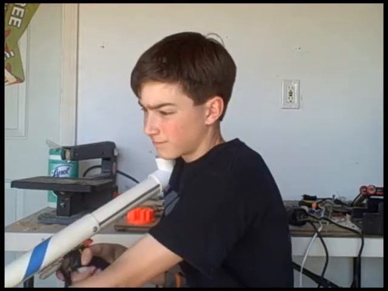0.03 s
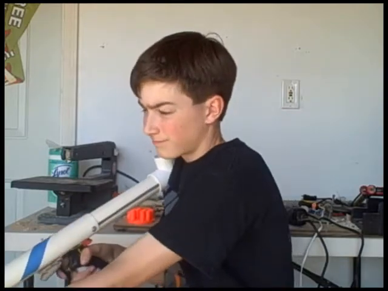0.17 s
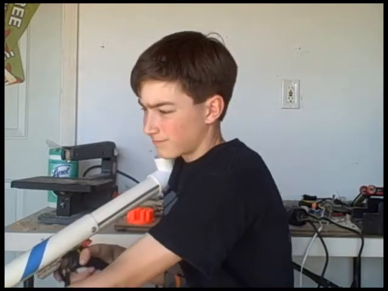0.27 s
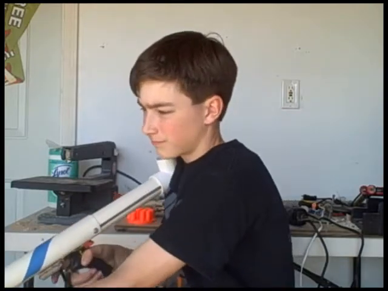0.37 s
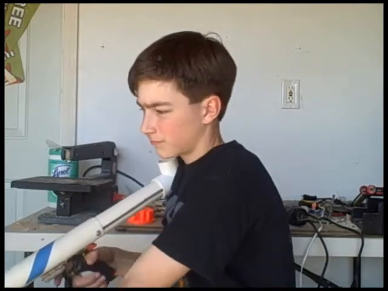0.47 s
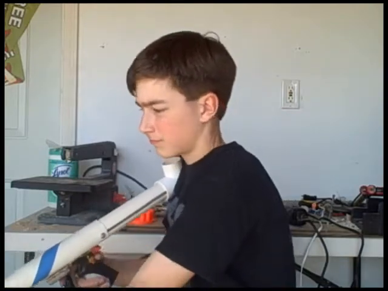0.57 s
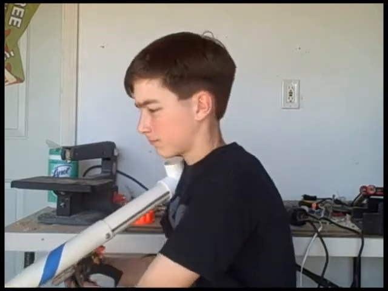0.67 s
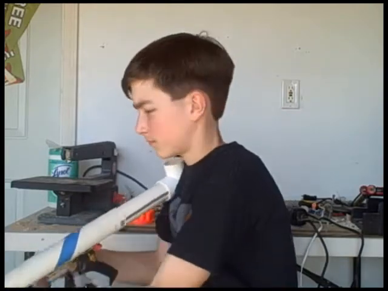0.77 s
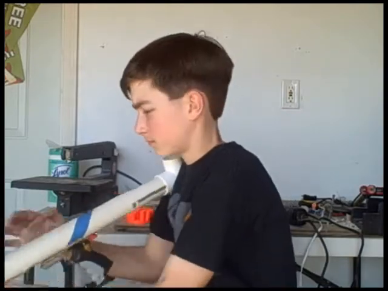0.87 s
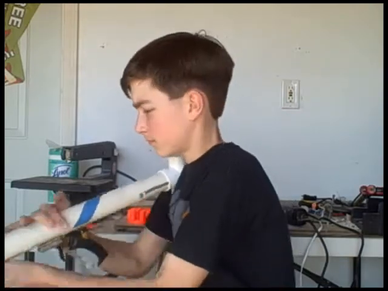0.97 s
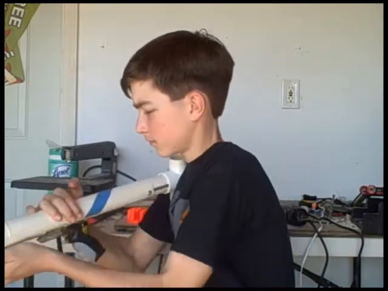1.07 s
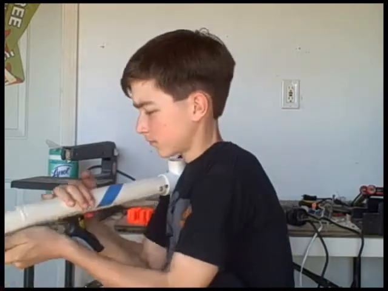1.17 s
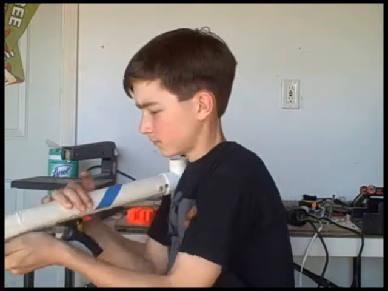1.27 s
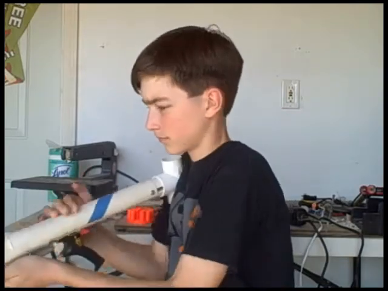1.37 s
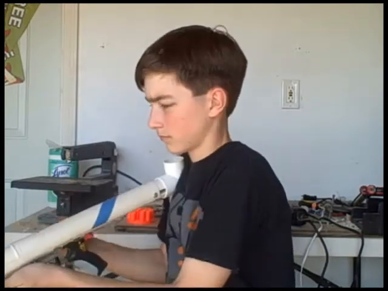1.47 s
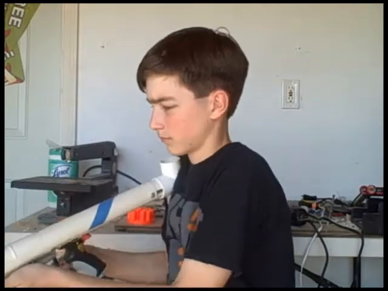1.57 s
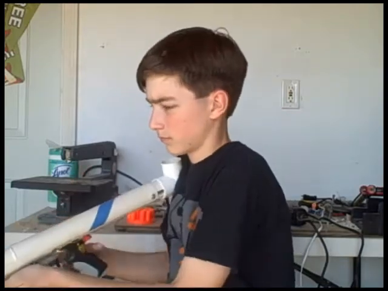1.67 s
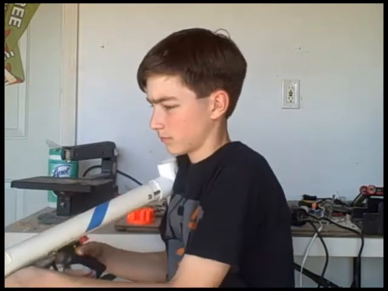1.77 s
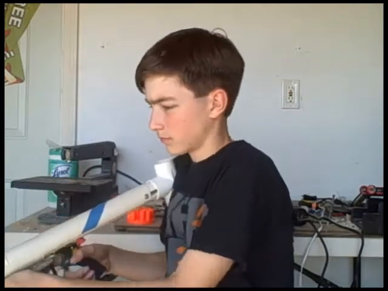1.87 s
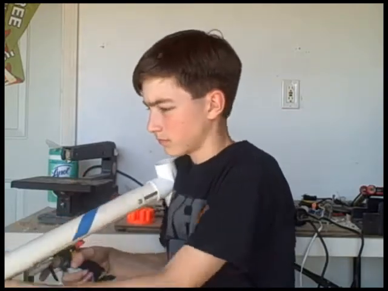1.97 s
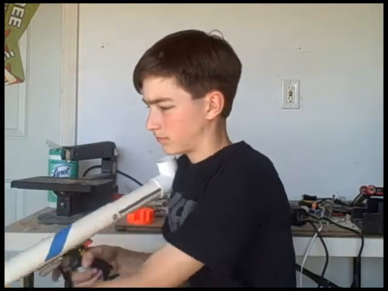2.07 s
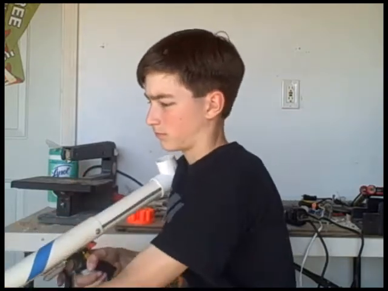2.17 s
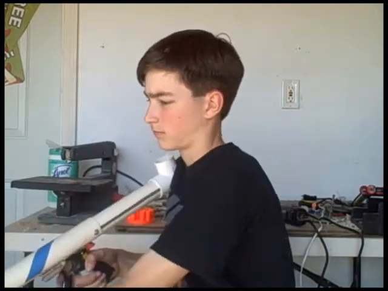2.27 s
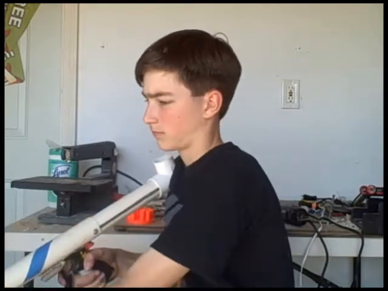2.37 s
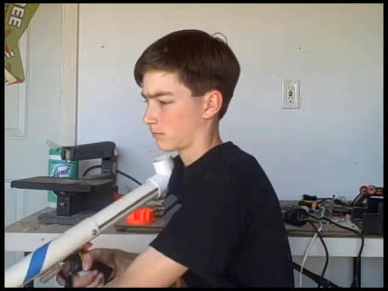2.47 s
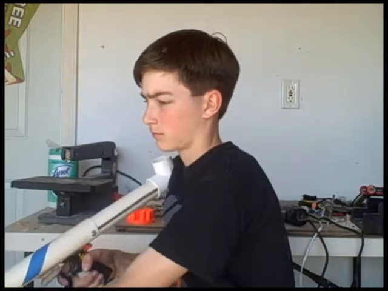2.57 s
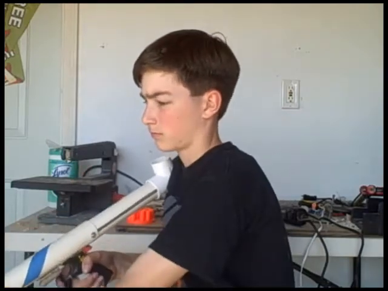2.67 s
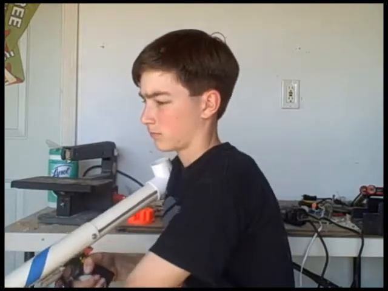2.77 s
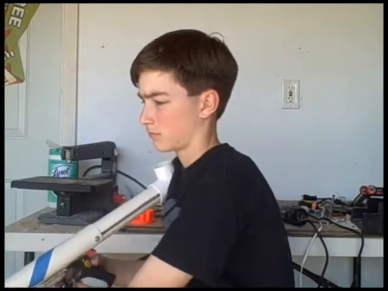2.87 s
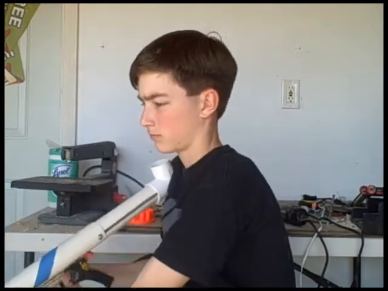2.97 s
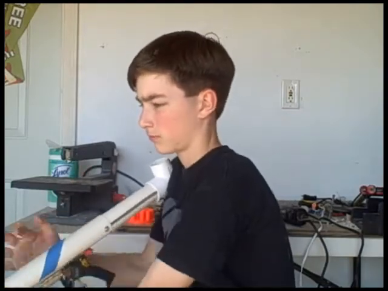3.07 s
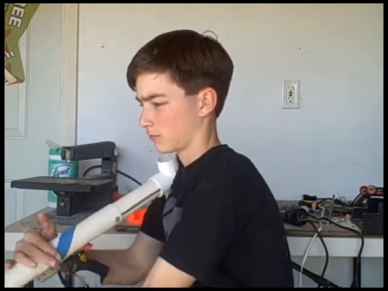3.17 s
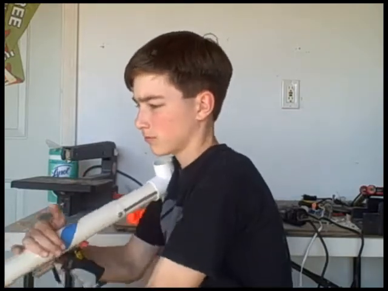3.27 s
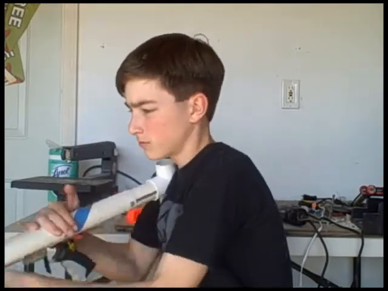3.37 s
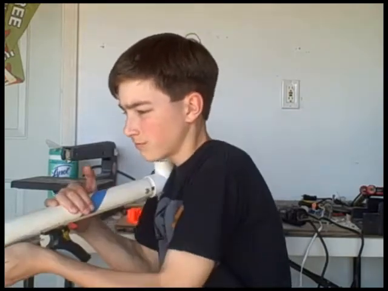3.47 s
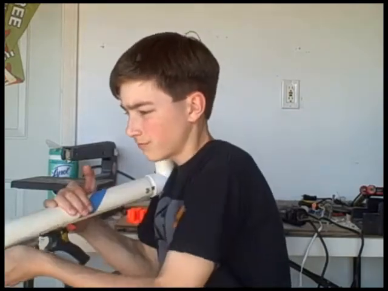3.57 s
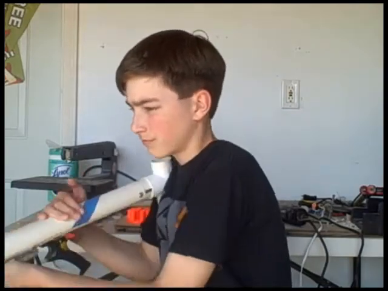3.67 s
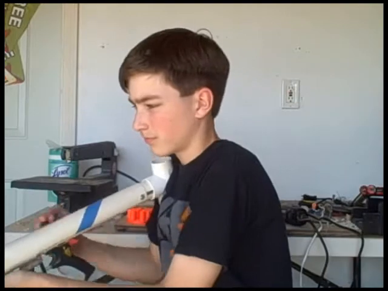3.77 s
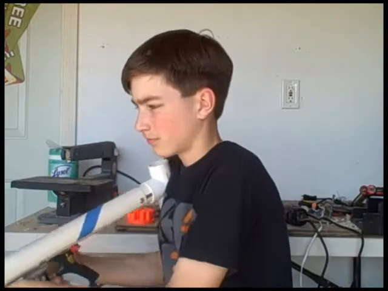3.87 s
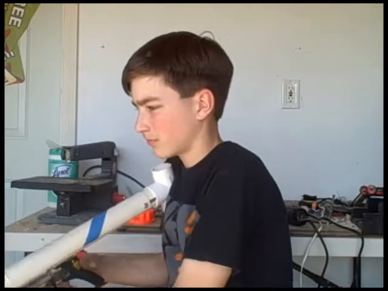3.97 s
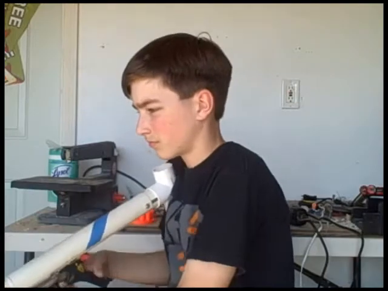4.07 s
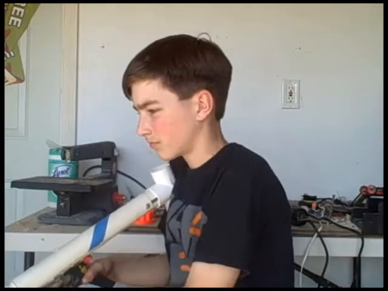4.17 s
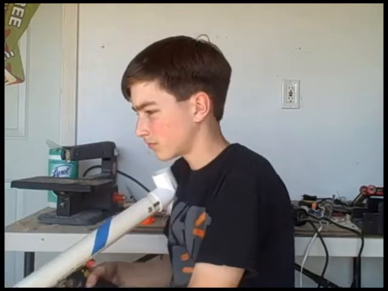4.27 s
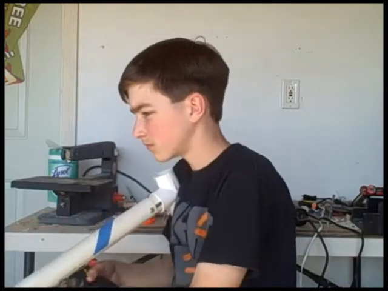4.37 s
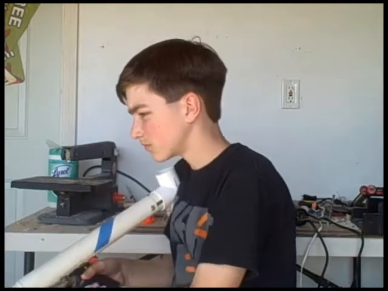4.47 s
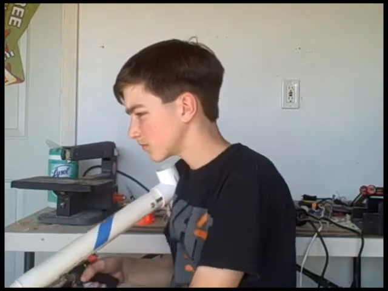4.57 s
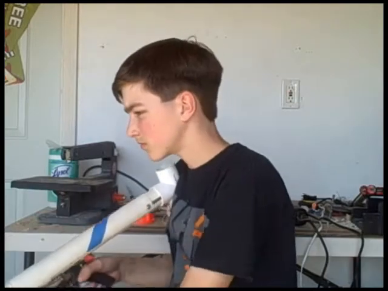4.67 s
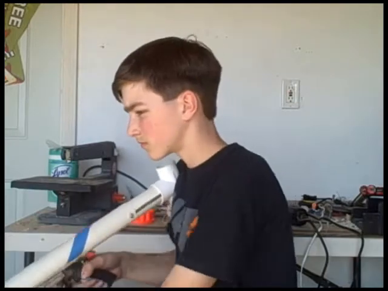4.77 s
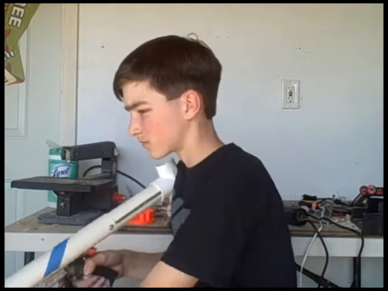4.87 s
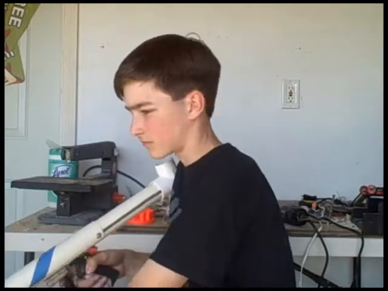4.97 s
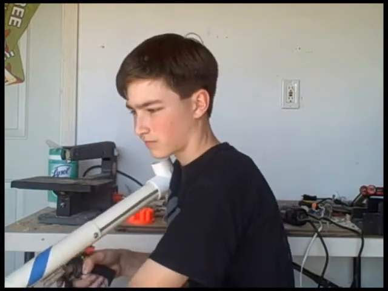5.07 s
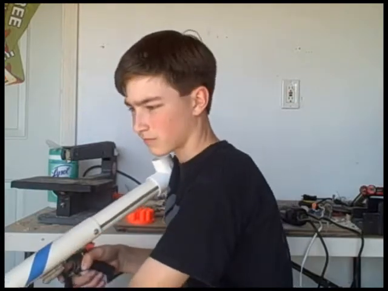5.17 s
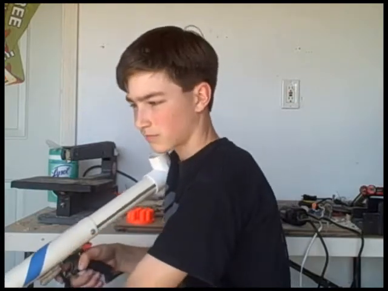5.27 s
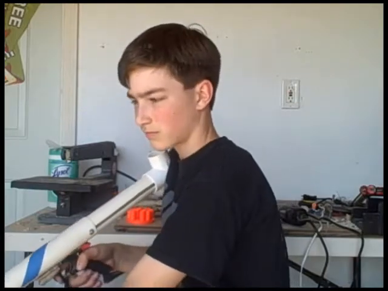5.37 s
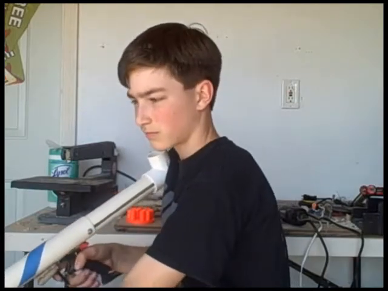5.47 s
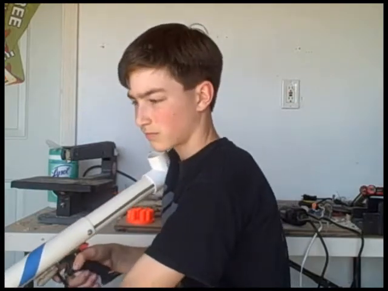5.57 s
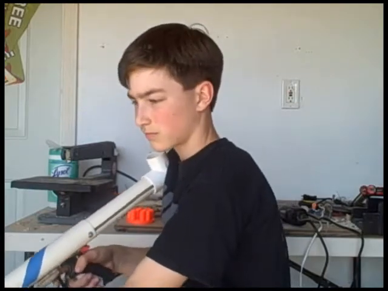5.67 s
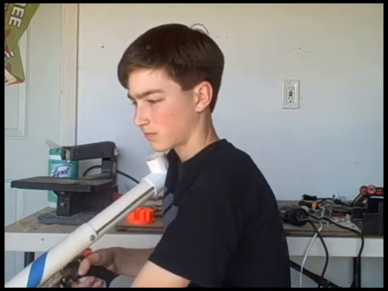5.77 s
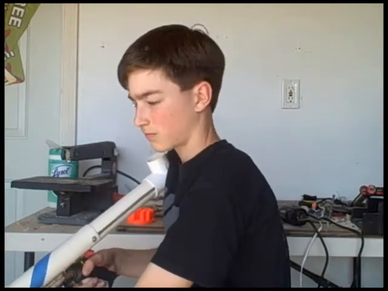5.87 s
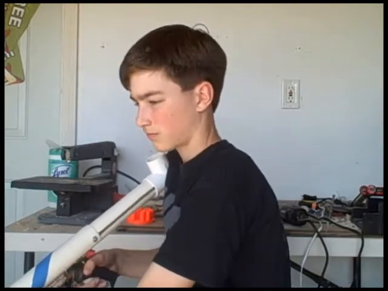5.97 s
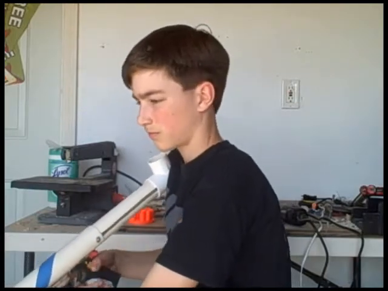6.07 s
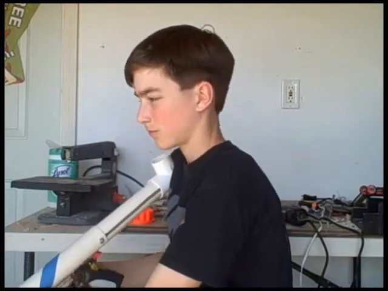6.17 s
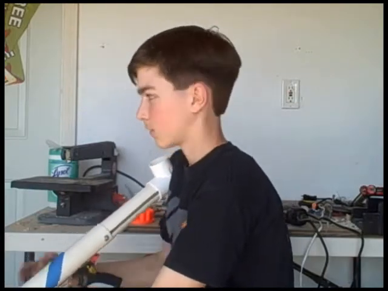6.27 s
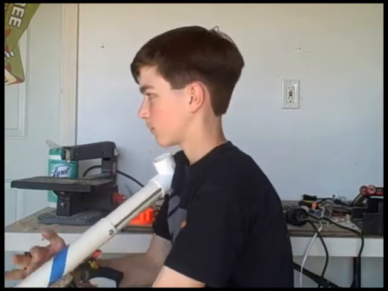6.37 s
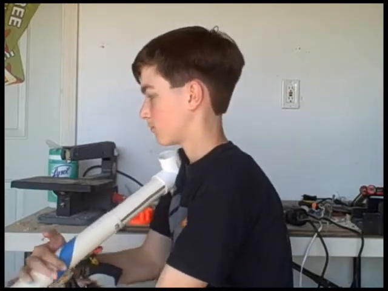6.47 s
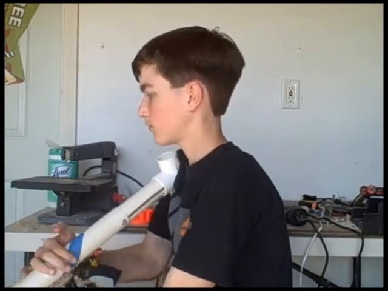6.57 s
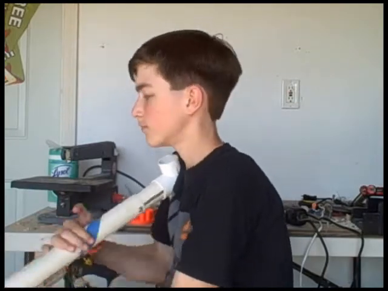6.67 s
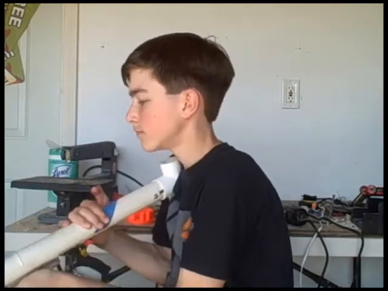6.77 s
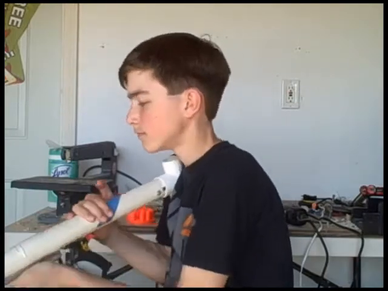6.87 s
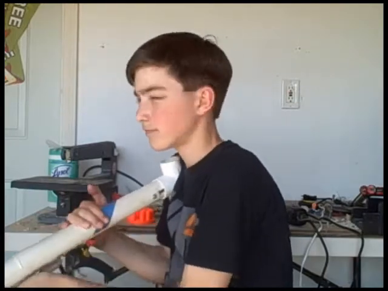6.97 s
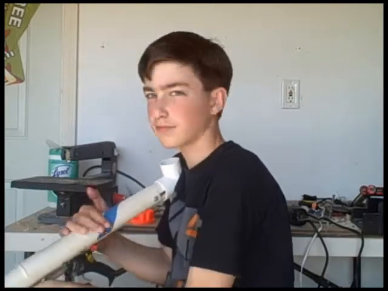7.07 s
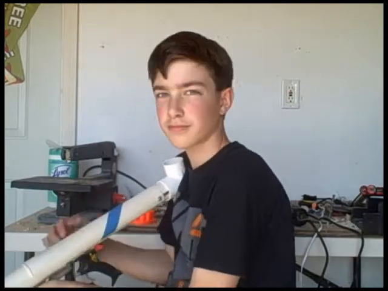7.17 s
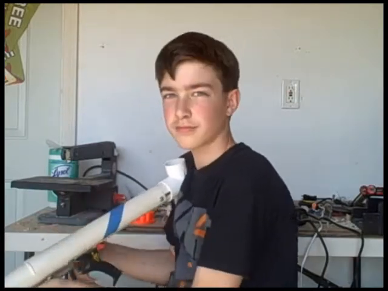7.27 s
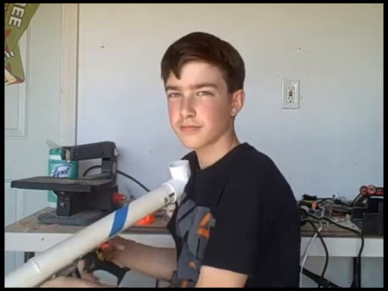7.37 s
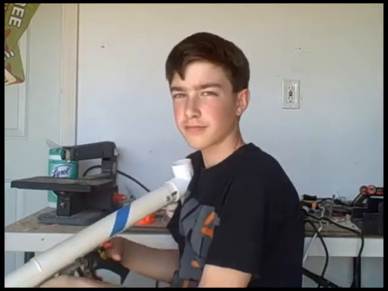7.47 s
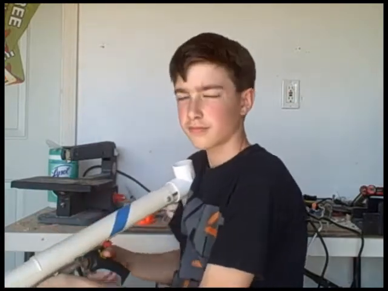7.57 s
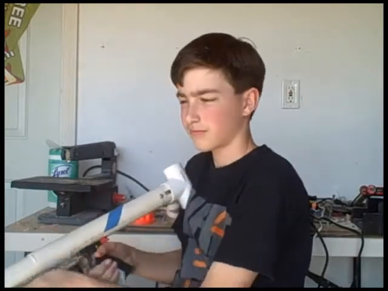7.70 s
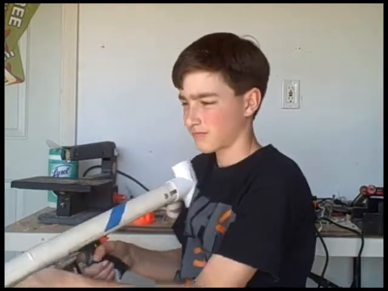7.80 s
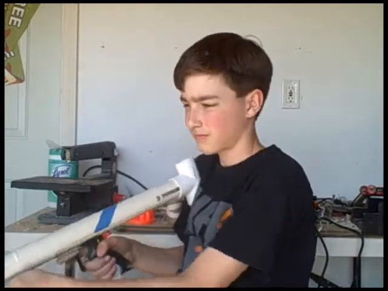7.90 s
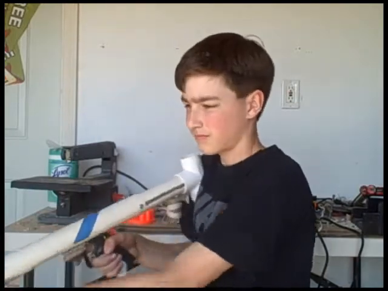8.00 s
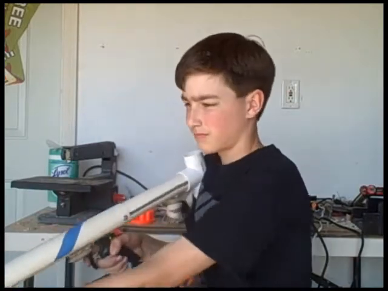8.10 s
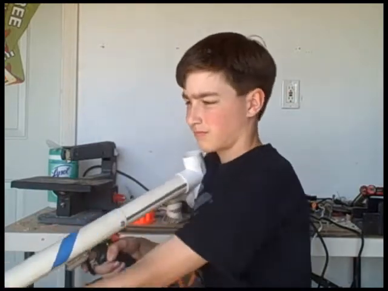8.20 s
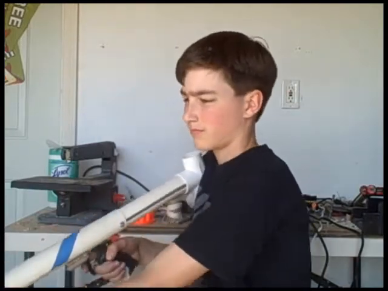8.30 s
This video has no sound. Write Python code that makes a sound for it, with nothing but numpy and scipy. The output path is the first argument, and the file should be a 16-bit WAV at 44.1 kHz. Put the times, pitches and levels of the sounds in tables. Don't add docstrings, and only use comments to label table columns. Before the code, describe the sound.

Close to a small camera microphone in a hard-walled workshop, a plastic-pipe dart blaster fires almost at once: a tiny air rush, a distorted plunger slam, and the dart smacking a wall. Hollow clacks, ticks and a squeaky sliding pump ending in a sharp catch snap follow. The cycle repeats with a second and third shot, then one last cocking. Low traffic and a distant engine drone lie underneath.

```python
import sys
import numpy as np
from scipy import signal
from scipy.fft import rfft, irfft, next_fast_len
from scipy.io import wavfile
from scipy.ndimage import uniform_filter1d

SR = 44100
rng = np.random.default_rng(int(sys.argv[2]) if len(sys.argv) > 2 else 0)


def to_wav(sig):
    pcm = np.clip(np.atleast_2d(sig), -1, 1) * 32767
    pcm = np.round(pcm).astype(np.int16)
    wavfile.write(sys.argv[1], SR, pcm.T)


def to_linear_factor(level_db):
    exponent = np.asarray(level_db, float) / 20
    return 10 ** exponent


N = 367649
PADDED = next_fast_len(N)
HZ = np.fft.rfftfreq(PADDED, 1 / SR) + 1e-3
TIME = np.arange(N) / SR

# start_s, level_db
RUMBLE = [(0.0, -48), (0.65, -58), (0.9, -54), (2.111, -54.5), (2.76, -51.5), (2.95, -53), (4.18, -55.5),
          (4.92, -52), (5.11, -52.5), (5.95, -62), (6.731, -58.5), (8.15, -55), (8.34, -48)]
# pitch_hz, level_db (per Hz)
ROAD = [(12, -46), (20, -7), (47, -16.5), (64, -6), (90, -1.5), (329, -24.5), (700, -61.5), (22000, -120)]
# pitch_hz, level_db (per Hz)
HISS = [(90, -8.5), (400, -25), (521, -25), (719, -26), (1530, -37), (7100, -48.5), (12500, -48),
        (22000, -120)]
# pitch_hz, width_hz, level_db
FAN = (530, 16, 4.2)
# start_s, firing_hz, level_db
DRONE = [(0, 92.6, -50.5), (.45, 92, -59), (.75, 91.35, -44.5), (.93, 91.5, -39), (1.241, 92.1, -53),
         (1.661, 91.76, -41.5), (2.16, 92.44, -44.5), (2.42, 92.7, -46), (2.85, 90.9, -47.5),
         (3.25, 84.6, -64), (3.54, 85.6, -48), (3.9, 80.7, -60.5)]
# start_s, end_s, level_db
SECOND_HARMONIC = [(.1, 2.5, -64.5), (2.8, 3.28, -56.5)]
THIRD_HARMONIC = [(.7, 2.244, -60.5), (2.751, 2.83, -60)]

# pitch_hz, width_hz, level_db
BOOM = [(177, 58, 4), (234, 5.1, 5), (325, 29, 7.5), (399, 68, 8.5), (484, 19, -1.5), (520, 20, 0.5)]
BODY = [(700, 34, 1.5), (935, 170, 2.3), (1146, 41, 1.7), (1350, 230, 2.8)]
SHELL = [(1590, 930, 2.8), (2140, 1500, 0.41), (2450, 150, 0.64), (2910, 450, 0.51)]
EDGE = [(5640, 3600, 0.43), (7730, 290, 0.28)]
# shell_db, boom_db, body_db, edge_db
PART_DB = (-3, 0, -1, 3)

# trigger_s, plunger_home_s, trigger_db, air_rush_db, pocket_whistle_db
SHOTS = [
    (0.1578, 0.1741, -30, -16.5, -31.5),
    (2.587, 2.609, -27.5, -18.5, -11),
    (5.497, 5.519, -32, -18.5, -15),
]
# boom_db, body_db, edge_db (relative), contact_ms
TRIGGER_COLOUR = (-2, -5.5, -11.5, 3.5)
# peak_db, boom_db, body_db, edge_db (relative), contact_ms
CRACK = (-2, -13.5, -7, -6, 1.5)
# start_s, peak_db, boom_db, body_db (relative)
SLAMS = [(0.176, -3, -6.5, -7.5), (0.1836, 0, -5.5, -6), (0.1911, -6, -6, -9.5), (0.204, -14, 2.5, 3.5),
         (0.221, -14, -1, -3), (0.2352, -9.5, -7, -7.5), (2.6103, -1.5, -4, -18), (2.615, -7, -4.5, -19.5),
         (2.621, -8, -8, -9.5), (2.634, -16.5, 1.5, -11), (2.6522, -8, -1, -9.5), (2.6648, -11, -3.5, -3),
         (5.5200, -0.5, -13, -6), (5.5277, -0.5, -3.5, -1.5), (5.5378, 1, -5.5, -14.5),
         (5.5461, -15, 6.5, -8), (5.5629, -7, 0, -18), (5.578, -19.5, 3.5, -23)]
# pitch_hz, width_hz, level_db
RUSH_WHISTLE = (5900, 520, 5.9)
SEAL_S = (.0015, .006, .008)
POCKET_S = (.002, .009, .005)
# start_s, length_s, from_hz, to_hz, peak_db
EXIT = [
    (.179, 0.029, 947, 1295, -14),
    (2.613, .012, 2403, 3290, -14),
    (5.522, .018, 848, 1710, -8),
]
# start_s, peak_db, width_ms
STRIKE = [
    (.223, -7, 0.82),
    (.2345, -11.5, 0.83),
    (2.6525, -5, 0.65),
    (5.5792, -8.5, 0.58),
]

# peak_db, pitch_hz, t60_s
THUMP = (-21.5, 120, 0.2)
# start_s, peak_db, pitch_hz, t60_s
TUBE = [(.181, -10.5, 1200, 0.079), (2.632, -13.5, 780, .05), (5.545, -14.5, 350, 0.12),
        (2.651, -12.5, 130, 0.11), (.177, -14, 250, 0.07), (2.611, -12.5, 290, 0.033),
        (5.540, -10, 600, 0.076), (2.8, -44, 560, 0.017)]
# start_s, peak_db, pitch_hz, t60_s
WALL = [(0.221, -14.5, 253.7, 0.099), (0.235, -19, 250, 0.12), (2.6532, -11.5, 266.4, 0.14),
        (2.66, -8, 217, 0.11), (5.548, -7, 245, 0.08), (5.577, -18.5, 217, 0.15)]
# start_s, peak_db, pitch_hz, t60_s
COLUMN = [
    (0.789, -23.5, 329, 0.14),
    (3.057, -28, 325, 0.16),
    (6.359, -45.5, 339, 0.25),
]
# start_s, peak_db, pitch_hz, t60_s
GRIP = [(1.379, -30, 1131, 0.013), (1.764, -32, 2300, .02), (1.764, -40, 1350, 0.018),
        (3.176, -31, 1320, 0.015), (3.686, -26.5, 1290, 0.011), (5.737, -37, 658, 0.013),
        (5.744, -20.5, 700, 0.0076), (6.675, -34, 830, 0.021), (7.026, -34, 724, 0.024),
        (7.62, -34.5, 1486, 0.023)]
# start_s, peak_db, pitch_hz, t60_s
CATCH = [(0.1584, -24.5, 2010, .02), (2.5864, -28, 1960, .02), (3.688, -30.5, 2330, 0.015),
         (4.7658, -24.5, 5620, 0.01), (6.553, -34, 2200, 0.0083), (6.563, -36, 2350, .02),
         (7.6195, -28.5, 2100, 0.0095)]
# start_s, peak_db, pitch_hz, t60_s
SLEEVE = [(1.194, -31, 2275, 0.03), (1.208, -26.5, 448, 0.061), (3.056, -27, 1270, 0.032),
          (3.506, -24.5, 2317, 0.035), (3.521, -33, 492, 0.11), (6.82, -29, 512, 0.059)]
# start_s, peak_db, pitch_hz, t60_s
CREAKS = [(1.978, -50, 2880, .02), (2.035, -34, 5800, 0.01), (2.056, -39, 5770, .012),
          (2.121, -37, 5770, .015), (2.95, -53, 1400, .09), (2.966, -43, 2400, 0.018),
          (3.438, -40, 1750, .012), (3.483, -31.5, 540, 0.064), (4.827, -44, 930, 0.043),
          (4.828, -42, 3600, .03), (4.831, -47, 5500, .02), (4.92, -46, 5700, .03),
          (5.004, -29, 1554, 0.032), (6.262, -51, 1220, 0.045), (6.827, -32.5, 1300, 0.033),
          (7.411, -52.5, 1522, 0.071), (7.41, -56, 3780, .04), (7.531, -53, 1390, 0.08),
          (7.938, -38, 842, 0.043), (7.999, -39, 2400, .04), (8.082, -42, 2420, .015),
          (8.108, -42, 3900, .012)]
# start_s, peak_db, lower_hz, upper_hz
SPOTS = [(0.6742, -39, 2468, 7490), (0.6837, -40, 3670, 5360), (0.7223, -34, 2810, 4610),
         (0.7763, -24, 2990, 4690), (0.7876, -11.5, 2863, 4900), (1.0007, -29, 3831, 5980),
         (1.1716, -27, 2070, 6080), (1.192, -16, 2200, 5950), (1.347, -39, 3310, 5210),
         (1.7624, -29, 2425, 7590), (1.9656, -46, 2736, 4500), (2.0122, -40, 2200, 5660),
         (2.2093, -7.5, 3690, 4750), (2.9296, -41, 3730, 5200), (3.055, -23, 2660, 6230),
         (3.172, -29, 2762, 4480), (3.3076, -30, 1862, 5030), (3.486, -18, 2250, 6080),
         (3.5048, -27, 2322, 4500), (4.1299, -40, 2435, 4620), (4.2886, -30, 3460, 4250),
         (4.6364, -33, 2910, 5790), (5.0018, -13, 3210, 4470), (5.2764, -36.5, 2518, 6750),
         (6.3563, -37, 2124, 4870), (6.4417, -39, 2367, 5730), (6.7073, -35, 2640, 7060),
         (6.796, -30, 2333, 6250), (6.8192, -17, 2420, 7560), (6.983, -35, 3600, 4520),
         (7.405, -46, 2080, 4570), (7.5279, -39, 2403, 7010), (7.9125, -30, 2730, 5790),
         (7.933, -23, 2510, 5870), (8.1603, -9.5, 3750, 4480)]
# pitch_ratio, level_db
PARTNER = (1.08, -6.5)

# start_s, peak_db, low_db, edge_db (relative)
TICKS = [(0.6754, -45, -13, -8.5), (0.6843, -38, -10, -8), (0.7218, -36, -10, -6), (1.0011, -32, -7.5, -2),
         (1.3384, -50, -14, -5), (1.3458, -39, -25, -2), (1.7624, -30, -14.5, -9), (1.9515, -43.5, -8, -13),
         (1.9664, -42, -18, -5.5), (2.0128, -39, -7, -5), (2.9302, -40, -17, -2.5), (3.2414, -51, -10, -10),
         (3.3079, -28.5, -15, -16), (3.4381, -48, -10, -7), (3.589, -42, -15, -17), (3.627, -50, -15, 1),
         (4.1305, -40.5, -8.5, -3.5), (4.2398, -40.5, -16, -7), (4.2892, -35.5, -13, -5),
         (4.5805, -45, -20, -3), (4.595, -40, -15, -1), (4.6369, -35, -17, -3.5), (5.2764, -37, -15.5, -4),
         (6.1789, -40, -19.5, -6.5), (6.4428, -37.5, -7, -2.5), (6.519, -55, -16, 2.5),
         (6.553, -32.5, -5.5, -20), (6.762, -46, -15, 7), (6.983, -41.5, -25, 0.5),
         (7.4056, -44.5, -9, -15), (7.5283, -36, -17, -5), (7.6196, -30.5, -15, -8.5),
         (7.639, -38, -18, -6)]
# start_s, peak_db,
# low_db, edge_db (relative)
CLACKS = [(0.7718, -33, -17, -20), (0.7754, -23, -22, -14), (0.782, -32, -12, -20), (0.7972, -21, -23, -12),
          (0.8035, -27, -18, -12), (1.1717, -25.5, -21, -10), (1.1862, -25, -6, -12),
          (1.1926, -17.5, -11.5, -8), (3.0556, -21, -14.5, -14), (3.1715, -27.5, -36, -7.5),
          (3.1772, -36.5, -3.5, -6), (3.485, -23.5, -17, -11.5), (3.5054, -20.5, -10.5, -9),
          (3.5184, -23.5, -4, -18), (3.687, -33.5, 2, -5.5), (6.796, -28, -8.5, -19),
          (6.8201, -27, -4.5, -14), (7.9128, -31.5, -5.5, -7)]
# start_s, peak_db, low_db, edge_db (relative)
BUMPS = [(0.6542, -51, -8, -11), (1.0125, -56, -12, -13), (1.3784, -32, 3.5, -7), (1.8285, -46, -9, -10),
         (2.0262, -45, -8, 0), (2.0356, -38, 0.5, -3), (2.946, -42, -17, -5), (3.6743, -39.5, -9, -5.5),
         (4.3271, -51.5, 5, 0), (4.7534, -33, -8, -6), (5.7365, -40, 6, -9), (6.1555, -48, -16, -7),
         (6.2632, -50, -2, -20), (6.3223, -41, -6, -14), (6.3569, -35, -3.5, -30), (6.6742, -43.5, -9, -5),
         (6.7075, -35, -11, -8), (7.0256, -36, 1.5, -8.5), (7.5567, -45.5, -5, -1), (7.693, -49, -1, -8),
         (7.72, -51.5, 1, -14), (7.825, -54, -19.5, -4), (8.0803, -42, -21, 0)]
# start_s, peak_db, low_db (relative), length_ms
RATTLE = [(0.8281, -27.5, -13.5, 14.6), (1.1426, -40, -22, 10), (1.160, -38.5, 0.5, 38),
          (1.206, -45, 9.5, 10), (1.369, -36.5, 0, 4.7), (3.0154, -45, -1, 16), (3.469, -38.5, -3, 12),
          (3.494, -29.5, -3.5, 12.6), (6.806, -45, -18, 16), (6.8187, -26.5, -9, 7.6),
          (7.9328, -32.5, -1, 7.7)]
# start_s, peak_db, rebound_db
LATCH = [
    (0.7866, -8.5, -21.5),
    (2.2098, -9.5, -23),
    (5.0015, -13, -24.5),
    (8.1606, -9.5, -24),
]

# start_s, end_s, from_db, to_db, low_db (relative)
SCRAPE = [(0.728, 1.204, -62.5, -63, -4.5), (1.406, 1.43, -73, -71, -6), (1.756, 2.0, -76, -85, -12.5),
          (2.97, 3.262, -62.5, -57.5, -12.5), (3.398, 3.559, -54, -58, -6), (3.82, 3.853, -69, -80, -8.5),
          (4.168, 4.588, -74.5, -79.5, 0), (4.734, 4.753, -70, -53, -8), (6.29, 6.383, -62, -66.5, -12),
          (6.474, 6.518, -62, -64, -13), (6.57, 6.598, -63, -68, -9), (6.679, 6.829, -55.5, -45.5, -9),
          (7.001, 7.018, -75, -60, -19), (7.426, 7.48, -71.5, -78, 0), (7.831, 7.903, -79, -65, -6)]
# pitch_hz, level_db (per Hz)
SCRAPE_COLOUR = [(710, -32.5), (1200, -0.5), (2930, -4), (5400, -10.5), (10900, -10.5), (12500, -18.5),
                 (16200, -58.5), (22000, -120)]
# pitch_hz, width_hz, level_db
SQUEAK = [(876, 16, 3), (3045, 45, -6.5), (5620, 150, 14)]
# start_s, end_s, jolt_db, glide_db
SLIDE = [
    (2.027, 2.201, -46, -46),
    (4.76, 4.993, -40, -50.5),
    (7.947, 8.157, -51, -48.5),
]
# from_hz, to_hz, level_db
CAVITY = (880, 1030, -6)
# pitch_hz, t60_s, level_db
ROOM = [(144, 0.25, -15), (383, 0.22, -11), (1033, 0.2, -1.5), (2430, 0.29, -8), (5280, 0.23, -2),
        (9700, 0.2, -5)]


def unit(x):
    return x / np.sqrt(np.mean(x ** 2))


def band(lo_hz, hi_hz):
    s = 1j * HZ
    return (s / (s + lo_hz)) ** 2 * (hi_hz / (s + hi_hz)) ** 2 / (1 + (lo_hz / hi_hz))


def ringing(modes):
    return 1 + sum(to_linear_factor(db) * 1j * HZ * w / (f * f - HZ ** 2 + 1j * HZ * w) for f, w, db in modes)


def colour(points):
    f, db = np.transpose(points)
    return to_linear_factor(np.interp(np.log(HZ), np.log(f), db))


def shaped(x, response):
    return irfft(rfft(x, PADDED) * response, PADDED)[:N]


def steep(lo_hz, hi_hz, modes):
    edges = signal.butter(3, (lo_hz, hi_hz), "band", fs=SR, output="sos")
    part = signal.sosfreqz(edges, HZ, fs=SR)[1] * ringing(modes)
    return part / np.sqrt(np.mean(np.abs(part) ** 2))


def walk(rate_hz):
    hold = int(SR / rate_hz)
    steps = np.repeat(rng.standard_normal(N // hold + 1), hold)
    return unit(uniform_filter1d(steps, hold)[:N])


def glide(start, length, hz, shape):
    out, u = np.zeros(N), np.linspace(0, 1, int(length * SR))
    first = int(start * SR)
    out[first:first + len(u)] = shape(u) * np.sin(2 * np.pi * np.cumsum(hz(u)) / SR)
    return out


def traffic():
    hiss_db, street_share = -61.5, .25
    s, db = np.transpose(RUMBLE)
    swell_db = np.interp(TIME, s, db)
    split = 1 / (1 + (HZ / 260) ** 4)
    low = unit(shaped(rng.standard_normal(N), colour(ROAD) * np.sqrt(split)))
    high = unit(shaped(rng.standard_normal(N), colour(HISS) * ringing([FAN]) * np.sqrt(1 - split)))
    low_db = swell_db + 1.5 + 1.5 * walk(5)
    high_db = hiss_db + street_share * (swell_db - db.mean()) + .5 * walk(2.8)
    return low * to_linear_factor(low_db) + high * to_linear_factor(high_db)


def spell(rows):
    fade_s = 0.24
    return sum(to_linear_factor(db) * np.interp(TIME, (a - fade_s, a, b, b + fade_s), (0, 1, 1, 0)) for a, b, db in rows)


def drone():
    s, hz, db = np.transpose(DRONE)
    turn = 2 * np.pi * np.cumsum(np.interp(TIME, s, hz)) / SR
    levels = to_linear_factor(np.interp(TIME, s, db, right=-120)), spell(SECOND_HARMONIC), spell(THIRD_HARMONIC)
    return sum(np.sqrt(2) * gain * np.sin((k + 1) * turn) for k, gain in enumerate(levels))


def firing():
    blast_ms, blast_edge_db, dulling_db_per_s = 6.88, -9.5, 150.5
    home = np.array([shot[1] for shot in SHOTS])
    rows = [(s, db, *TRIGGER_COLOUR) for s, _, db, _, _ in SHOTS]
    rows += [(s, *CRACK) for s in home]
    for s, db, boom, body in SLAMS:
        age = np.abs(s - home).min()
        rows.append((s, db, boom, body, blast_edge_db - dulling_db_per_s * age, blast_ms))
    return rows


def pipe(blows):
    size = 4096
    force, t = np.zeros((4, N + size)), np.arange(size) / SR
    grit = rng.standard_normal((len(blows), 4, size))
    for (s, db, boom, body, edge, ms), g in zip(blows, grit):
        fade = max(ms, .2) / 1000 + np.array([[0], [.003], [.001], [0]])
        push = g * np.exp(-t / fade) * (1 - np.exp(-t / (0.27 * fade)))
        lines = rfft(push)
        even = irfft(lines / uniform_filter1d(np.abs(lines), size=7) ** .9, size)
        even *= np.exp(-(t / (6 * fade)) ** 4)
        even *= np.sqrt((push ** 2).sum(1) / (even ** 2).sum(1))[:, None]
        gain = to_linear_factor(db + np.array([0, boom, body, edge]) + PART_DB)[:, None]
        first = int(s * SR)
        force[:, first:first + size] += gain * even
    parts = steep(1400, 4700, SHELL), steep(210, 650, BOOM), steep(580, 1500, BODY), steep(4700, 15000, EDGE)
    return sum(shaped(f[:N], p) for f, p in zip(force, parts))


def rush():
    growth_db, sealed_fade_db = 23.5, 8.5
    air = shaped(rng.standard_normal(N), steep(900, 13000, [RUSH_WHISTLE]))
    swell = np.zeros(N)
    for (start, home, _, db, _), seal in zip(SHOTS, SEAL_S):
        levels = (db - growth_db, db, db - sealed_fade_db)
        swell += to_linear_factor(np.interp(TIME, (start, home - seal, home), levels, -120, -120))
    return swell * air


def modes():
    lower, upper = (-6, .009), (-9, .006)
    rings = [(shot[1], *THUMP) for shot in SHOTS]
    rings += COLUMN + TUBE + WALL + GRIP + CATCH + SLEEVE + CREAKS
    for s, db, *pair in SPOTS:
        rings += [(s, db + rel, hz, t60) for hz, (rel, t60) in zip(pair, (lower, upper))]
    ratio, partner_db = PARTNER
    out, t = np.zeros(N), np.arange(SR // 3) / SR
    for s, db, hz, t60 in rings:
        tone = np.sin(2 * np.pi * hz * t)
        tone += (hz > 600) * to_linear_factor(partner_db) * np.sin(2 * np.pi * hz * ratio * t)
        ring = to_linear_factor(db - 0.5 - 60 * t / t60) * tone * (1 - np.exp(-t * hz / 0.59))
        first = int(s * SR)
        out[first:first + len(t)] += ring[:N - first]
    return out


def pocket():
    from_hz, to_hz = 850, 5500
    out = np.zeros(N)
    for (_, home, _, _, db), length in zip(SHOTS, POCKET_S):
        out += to_linear_factor(db) * glide(home - length, length, lambda u: from_hz + (to_hz - from_hz) * u ** 3, np.sqrt)
    return out


def dart_exit():
    out = np.zeros(N)
    for s, length, from_hz, to_hz, db in EXIT:
        pitch = lambda u: from_hz + (to_hz - from_hz) * u
        out += to_linear_factor(db) * glide(s, length, pitch, lambda u: np.sin(np.pi * u))
    return out


def wall_strike():
    out = np.zeros(N)
    for s, db, ms in STRIKE:
        a = ((TIME - s) * 1000 / ms) ** 2
        out -= to_linear_factor(db) * (1 - a) * np.exp(-a / 2)
    return out


def puff():
    level_db, length_ms, late_s = -21.5, 16, 0.0022
    after = [np.maximum(TIME - shot[1] - late_s, 0) * 1000 / length_ms for shot in SHOTS]
    return sum(to_linear_factor(level_db) * np.e * a * (1 - a / 2) * np.exp(-a) for a in after)


def handling():
    hard, firm, soft = (-2.5, 1.66), (3, 3.2), (-2.9, 4.7)
    snap, rebound = (-22, -17.5, -8.5, 2), (-18, -4, -10, 3.5)  # boom, body, edge dB, contact ms
    rattle_edge_db, rebound_s = -7, 0.0074
    rows = []
    for table, (boom, ms) in ((TICKS, hard), (CLACKS, firm), (BUMPS, soft)):
        rows += [(s, db, low + boom, low, edge, ms) for s, db, low, edge in table]
    rows += [(s, db, low, low, rattle_edge_db, ms) for s, db, low, ms in RATTLE]
    rows += [(s, db, *snap) for s, db, _ in LATCH]
    return rows + [(s + rebound_s, db, *rebound) for s, _, db in LATCH]


def grips():
    attack_s, release_s, fade_db = 0.12, 0.032, 26
    return [[(a - attack_s, from_db - fade_db, low),
             (a, from_db, low),
             (b, to_db, low),
             (b + release_s, to_db - fade_db, low)] for a, b, from_db, to_db, low in SCRAPE]


def rub(moves, squeak, waver_db, lift_db):
    grains = rng.standard_normal((3, N)) * to_linear_factor(3.0 * np.minimum(rng.exponential(size=(3, N)), 3.6))
    high = unit(shaped(grains[0], colour(SCRAPE_COLOUR)))
    low = unit(shaped(grains[1], band(210, 1200) ** 2 * ringing(SQUEAK[:1])))
    slips = shaped(grains[2], colour(SCRAPE_COLOUR) * (ringing(SQUEAK[1:]) - 1))
    high = high + squeak * unit(slips) * np.maximum(walk(90), 0)
    out = np.zeros(N)
    for move in moves:
        s, db, low_db = np.transpose(move)
        out += to_linear_factor(np.interp(TIME, s, db, -120, -120)) * (high + to_linear_factor(np.interp(TIME, s, low_db)) * low)
    return out * to_linear_factor(lift_db + waver_db * (walk(40) + walk(14)) * .7)


def strokes():
    jolt_s, push_s, push_db = 0.009, 0.036, 3.5
    low_from_db, low_to_db = 0.5, -10
    return [[(a, db, low_from_db),
             (a + jolt_s, jolt_db, low_from_db),
             (a + 2.2 * jolt_s, db, low_from_db),
             (b - 2 * push_s, db, low_to_db),
             (b - push_s, db + push_db, low_to_db),
             (b, db + push_db, low_to_db)] for a, b, jolt_db, db in SLIDE]


def cavity():
    out, (from_hz, to_hz, rel_db) = np.zeros(N), CAVITY
    for stroke in strokes():
        s, db, _ = np.transpose(stroke)
        ends = s[[0, -1]]
        turn = 2 * np.pi * np.cumsum(np.interp(TIME, ends, (from_hz, to_hz))) / SR
        level_db = rel_db + np.interp(TIME, s, db, -120, -120) - np.interp(TIME, ends, (0, 9))
        out += to_linear_factor(level_db) * np.sin(turn)
    return out * walk(200)


def workshop(x):
    gap_ms, half = 1.6, SR // 2
    tail, t = np.zeros(N), np.maximum(TIME - gap_ms / 1000, 0)
    for f, t60, db in ROOM:
        decay = rng.standard_normal(N) * (t > 0) * to_linear_factor(-60 * t / t60)
        lines = rfft(decay, PADDED) * band(f / 1.5, f * 1.5) ** 2
        near = np.abs(lines)[(HZ > f / 1.3) & (HZ < f * 1.3)]
        tail += to_linear_factor(db) * irfft(lines, PADDED)[:N] * (t > 0) / np.sqrt(np.mean(near ** 2))
    fade = np.cos(np.pi * TIME[:half]) ** 2 * (t[:half] > 0)
    tail = tail[:half] * fade
    for _ in range(3):
        lines = rfft(tail, SR)
        even = uniform_filter1d(np.abs(lines), size=400) / uniform_filter1d(np.abs(lines), size=30)
        tail = irfft(lines * even ** .7, SR)[:half] * (fade > 0)
    return x + signal.fftconvolve(x, tail * fade)[:N]


def scene():
    outside = traffic() + drone()
    shots = pipe(firing()) + rush() + pocket() + dart_exit() + wall_strike() + puff()
    held = shaped(pipe(handling()), band(262, SR / 2))
    hands = rub(grips(), squeak=0.073, waver_db=3.6, lift_db=2.3)
    pumping = rub(strokes(), squeak=.5 * (TIME < 6.0), waver_db=2.2, lift_db=-2.8) + cavity()
    return (workshop(shots + modes() + held + hands + pumping) + outside)[None]


def band_limit(x):
    return signal.sosfilt(signal.ellip(6, .2, 40, 11850, fs=SR, output="sos"), x)


def top_cut(x):
    return signal.sosfilt(signal.butter(12, 13030, fs=SR, output="sos"), x)


def record(dry):
    ceiling = .64
    heard = band_limit(dry)
    saturated = heard / (1 + np.abs(heard / ceiling) ** 8) ** (1 / 8)
    return top_cut(band_limit(saturated))


dry = scene()
out = record(dry)
to_wav(out)
```